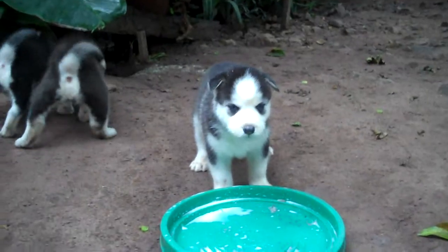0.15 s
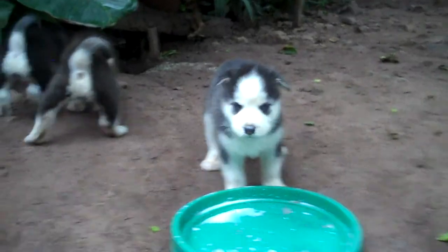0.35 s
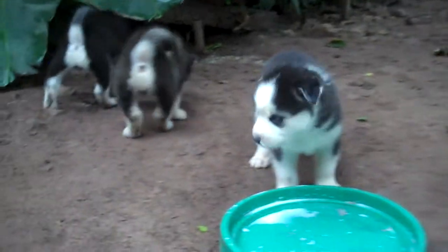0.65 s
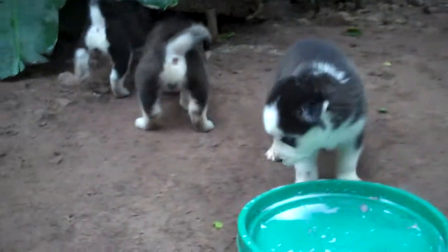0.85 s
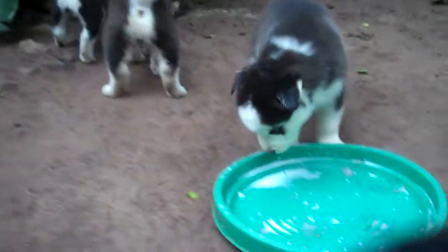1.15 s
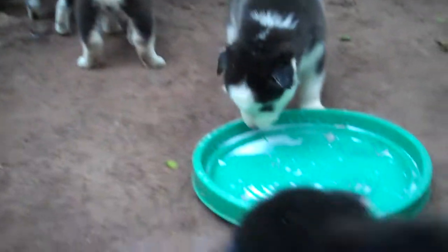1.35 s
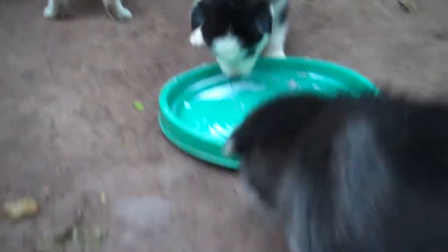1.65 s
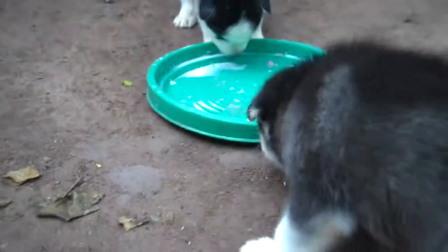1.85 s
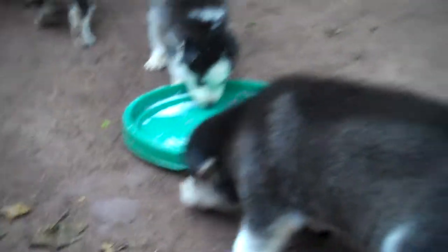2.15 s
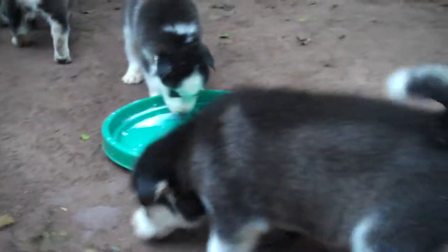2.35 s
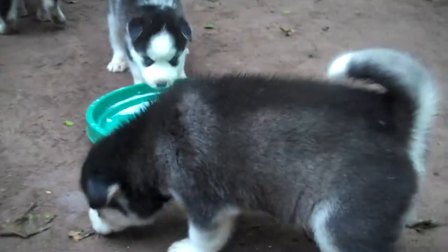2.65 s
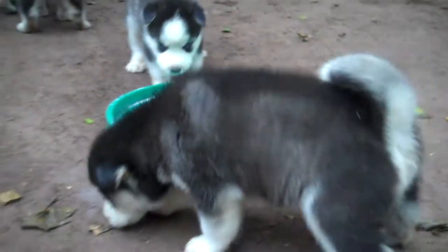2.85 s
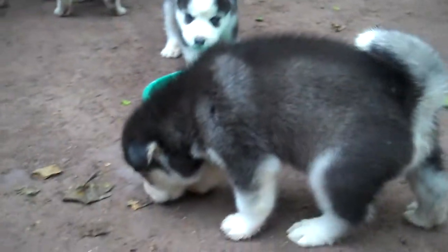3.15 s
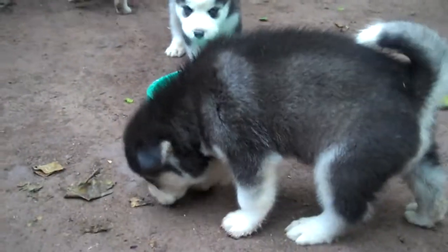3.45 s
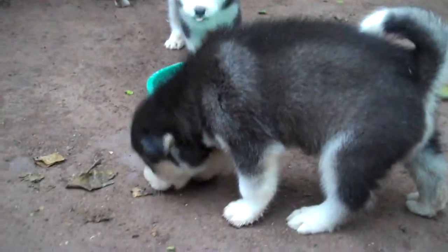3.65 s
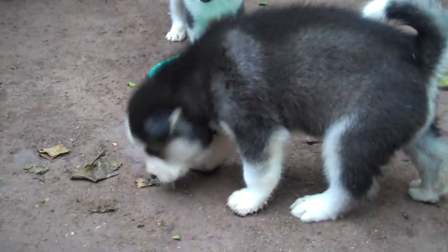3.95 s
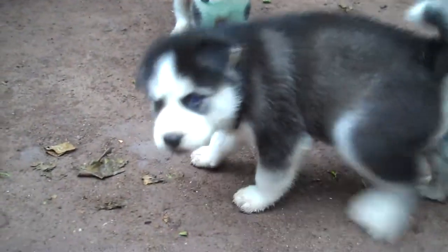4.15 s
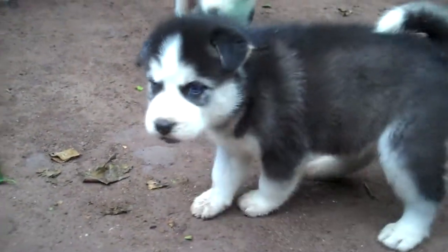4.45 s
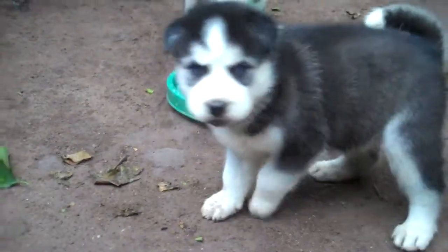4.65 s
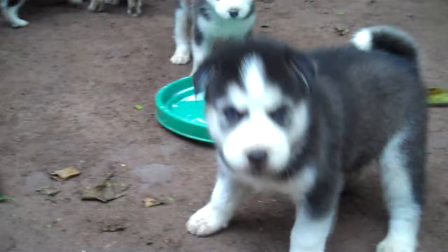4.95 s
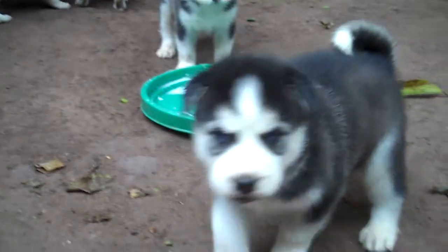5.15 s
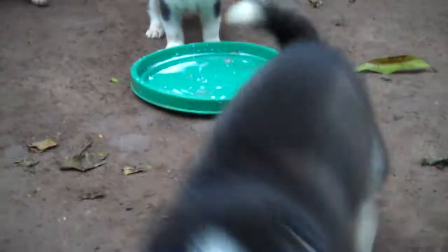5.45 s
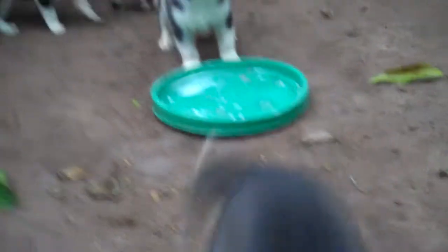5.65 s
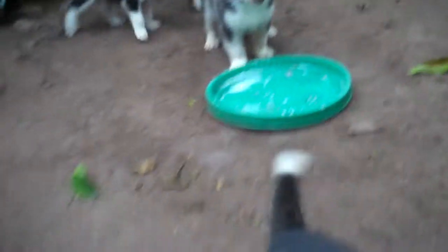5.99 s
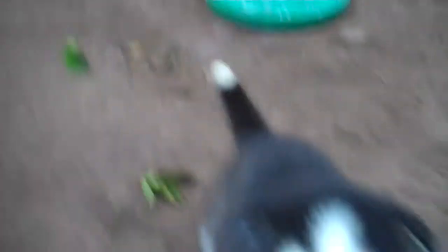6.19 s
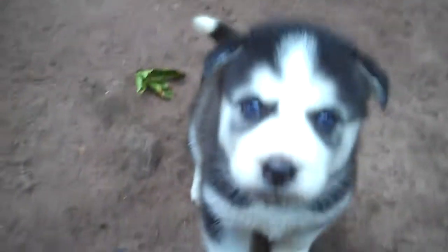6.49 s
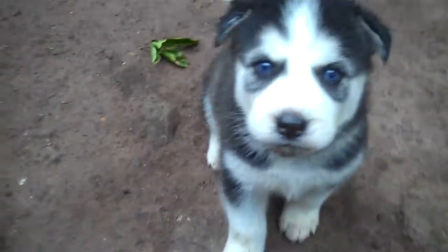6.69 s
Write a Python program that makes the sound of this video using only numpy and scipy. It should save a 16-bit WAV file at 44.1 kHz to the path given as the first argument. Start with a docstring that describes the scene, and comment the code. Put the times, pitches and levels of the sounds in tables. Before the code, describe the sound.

Outdoors on bare earth, puppies move close to the microphone: soft gritty scuffs, small dry ticks and a couple of hollow knocks. Early on a hoarse rooster crows far away over faint air murmur and hiss, with tiny bird peeps. Late, one puppy gives a single short, high, harsh yelp, very close and overloading; the background dips briefly, then light scuffs and ticks return.

```python
"""Puppies at a water dish, close to the microphone

On a yard's bare earth, paws scuff (brushing noise and grains), tongues and teeth tick and hard things knock
(damped rings), and one paw thuds (a dull noise push). One puppy yelps right at the microphone: harmonics sweep
through throat resonances, overload the recorder and turn its gain down for a moment. Far off a hoarse rooster
crows (smeared harmonics), birds peep (gliding pure notes), a motor hums (a wavering tone) and the open air
murmurs (shaped noise).
"""
import sys
import numpy as np
from scipy import signal
from scipy.fft import rfft, irfft
from scipy.io import wavfile
from scipy.ndimage import uniform_filter1d, minimum_filter1d

SR = 44100
rng = np.random.default_rng(int(sys.argv[2]) if len(sys.argv) > 2 else 0)


def generate_wav(sig):
    """Save sig (samples, or channels by samples) to the path in sys.argv[1] as 16-bit PCM at SR."""
    pcm = np.round(np.clip(np.atleast_2d(sig).T, -1, 1) * 32767).astype(np.int16)
    wavfile.write(sys.argv[1], SR, pcm)


N = 300872
T = np.arange(N) / SR
FREQS = np.fft.rfftfreq(N, 1 / SR)


def undb(db):
    """Decibels to gain."""
    return 10 ** (np.asarray(db) / 20)


def unit(x):
    """Scale to rms 1."""
    return x / np.sqrt(np.mean(x ** 2))


def shape(points, hz):
    """Gain of a (f/Hz, level/dB) spectrum at the given frequencies, joined along log frequency."""
    f, db = np.transpose(points)
    return undb(np.interp(np.log(hz + 1), np.log(f), db))


def filtered(x, gain):
    """Apply one gain for each of FREQS."""
    return irfft(rfft(x) * gain, N)


def noise(points):
    """Noise of rms 1 with the given spectrum."""
    return unit(filtered(rng.standard_normal(N), shape(points, FREQS)))


def walk(rate_hz):
    """Smooth random wander of rms 1, mostly slower than the given rate."""
    return unit(filtered(rng.standard_normal(N), np.exp(-np.minimum(FREQS / rate_hz, 10) ** 2)))


def swell(middle, length):
    """A bell-shaped rise and fall, 17 dB down at the ends of its length."""
    return np.exp(-2 * np.minimum(np.abs(2 * (T - middle) / length), 10) ** 2)


def rise(at, ramp):
    """A smooth step from 0 to 1 around the given time."""
    return .5 + .5 * np.tanh((T - at) / ramp)


def decay(age, t60):
    """Exponential die-away, 60 dB down after t60 seconds."""
    return np.exp(-np.log(1000) * np.minimum(age / t60, 10))


def yelp(rasp_jitter=0.025, air_db=-34, rasp_noise_db=-8, uneven=.6, resonance_lift=.2):
    """Vocal folds sweep an arch of pitch through the throat resonances; the forced start is harsh and uneven."""
    voice_jitter = .003  # share of the pitch
    hz, loudness, rasp, closing = yelp_controls()
    on = loudness > 1e-5
    unsteady_hz = hz * (1 + (voice_jitter + rasp_jitter * rasp) * walk(340))
    phase = 2 * np.pi * np.cumsum(unsteady_hz)[on] / SR
    k = np.arange(1, 19)[:, None]  # harmonic numbers
    partials = np.sin(k * phase + rng.uniform(0, 2 * np.pi, k.shape))
    gains = throat(k * hz[on], closing[on])
    voice, buzz = np.zeros(N), np.zeros(N)
    # the voice gains a little whenever a harmonic sits on a resonance
    power = (gains ** 2).sum(0) / 2
    lift = (power / power.max()) ** resonance_lift
    voice[on] = (gains * partials).sum(0) / np.sqrt(power) * lift
    # folds that slam shut fill the valleys between the resonances with overtones: f/Hz, level/dB
    harsh = [(25, 12), (80, -14.5), (210, 9), (330, 1.5), (480, 9), (750, -0.5), (980, 9.0),
             (1400, 2.5), (1950, 6.5), (3000, -13.0), (5500, -5.5), (7200, -6), (9000, -3.5), (14000, -9.0)]
    buzz[on] = unit((shape(harsh, k * hz[on]) * partials).sum(0))
    # the blast of air crackles differently at each microphone port
    crackle = undb(rasp_noise_db) * np.array([noise(harsh), noise(harsh)])
    air = unit(filtered(rng.standard_normal(N), throat(FREQS, 0)))
    flutter = 1 + .35 * rasp * walk(700)
    flutter[on] += uneven * rasp[on] * np.cos(phase / 2)  # strong and weak cycles alternate
    sound = voice * flutter + rasp * (buzz + crackle) + undb(air_db) * air
    return sound * loudness


def yelp_controls():
    """Pitch, loudness, rasp and mouth closing (0-1): one push that sags, then drops to a whimper."""
    start_s, attack_s, hold_s, release_s = 5.511, .0025, .124, .006
    level_db, sag_db_per_s = -.5, 26.5
    closes_after_s, closing_s, closed_db = 0.097, .007, -2.5
    whimper_db, whimper_after_s, whimper_s = -16, .018, .03
    age = np.clip(T - start_s, -hold_s, 2 * hold_s)
    spent = rise(start_s + hold_s, release_s)
    closing = rise(start_s + closes_after_s, closing_s)
    whimper = undb(whimper_db) * swell(start_s + hold_s + whimper_after_s, whimper_s)
    push = rise(start_s, attack_s) * (1 - spent + whimper)
    loudness = push * undb(level_db - sag_db_per_s * age + closed_db * closing)

    # rasp is strong in the forced start, nearly gone in the clear voice, back in the whimper
    forced_s, forced_rasp_db, clear_rasp_db, whimper_rasp_db = .033, -6, -38.5, -17.5
    forced = 1 - rise(start_s + forced_s, attack_s)
    rasp = undb(clear_rasp_db) + undb(forced_rasp_db) * forced + undb(whimper_rasp_db) * spent

    # pitch breaks from a squeak, arches over the resting pitch and collapses when the push ends
    rest_hz, top_of_arch_hz, arch_after_s, arch_width_s = 590, 908, .0595, .051
    squeak_hz, squeak_s, break_s, collapse_oct_per_s = 966, .007, .004, 15
    bell = np.exp(-((age - arch_after_s) / arch_width_s) ** 2)
    arch = rest_hz + (top_of_arch_hz - rest_hz) * bell
    hz = squeak_hz + (arch - squeak_hz) * rise(start_s + squeak_s, break_s)
    collapse = 2 ** (-collapse_oct_per_s * np.maximum(age - hold_s, 0))
    return hz * collapse, loudness, rasp, closing


def throat(hz, closing, muffle_db=17):
    """Gain of the steep throat resonances and nasal notches; the closing mouth muffles the upper ones."""
    # throat resonances: f/Hz, width/Hz, level/dB
    resonances = [(860, 1400, -37.5), (1296, 290, -1), (2630, 640, 8.5), (4044, 750, 5), (5280, 290, 1),
                  (6830, 960, -1), (8080, 400, -12), (12100, 6500, -42.5)]
    # bands the nose swallows: f/Hz, width/Hz, level/dB
    nose_notches = [(2230, 260, -22), (3540, 270, -19)]
    grid = np.linspace(0, SR / 2, 2048)
    gain = sum(undb(db) / (1 + ((grid - f) / (width / np.sqrt(2))) ** 2) ** 2 for f, width, db in resonances)
    notch_db = sum(db / (1 + (2 * (grid - f) / width) ** 2) for f, width, db in nose_notches)
    octaves_up = np.clip(np.log2((hz + 1) / 1400), 0, 1)  # full muffling from one octave above 1400 Hz
    return np.interp(hz, grid, gain * undb(notch_db)) * undb(-muffle_db * closing * octaves_up)


def scuffs(grain_spread_db=5, grains_per_s=900):
    """Each scuff is a smooth brush of earth plus grains of grit that snap under the paw."""
    # paws and fur on dry earth: middle t/s, length/s, level/dB, dull share/dB
    paw_moves = [(.049, .15, -40, -16), (.778, 0.088, -52, -4.5), (1.003, 0.088, -51.5, -9.5),
                 (1.116, .05, -43.5, -8.5), (1.193, 0.093, -46, -25), (1.37, 0.075, -58, -2.5),
                 (1.502, .05, -53, -19), (1.672, 0.054, -56.5, 1.5), (3.311, 0.05, -47.5, -27),
                 (3.659, 0.2, -51, -7), (3.856, 0.027, -41, -15), (3.887, 0.03, -44, -15),
                 (4, 0.083, -57, -5), (4.628, 0.16, -56, -4), (5.013, .33, -61, -11),
                 (5.282, .013, -49, -8), (5.306, .03, -48.5, -8.5), (5.46, 0.17, -47.5, -9),
                 (5.946, 0.36, -55, -6), (6.18, 0.18, -51.5, 1.5), (6.35, .34, -55.5, -15),
                 (6.708, 0.091, -42, -15.5)]
    # spectrum of snapping grit: f/Hz, level/dB per Hz
    grit_colour = [(300, -50), (2500, -13.5), (4500, -9), (6000, -0.5), (7700, 3.5), (9500, -11),
                   (14000, -23.5)]
    # spectrum of dull earth: f/Hz, level/dB per Hz
    earth_colour = [(100, -17.5), (500, -0.5), (1000, 4), (1900, 5), (3800, -1.5), (6000, -21.5),
                    (12000, -40.5)]
    gritty_s = 0.23  # short scuffs snap grit; longer ones mostly brush
    grains = (rng.random(N) < grains_per_s / SR) * rng.choice([-1, 1], N)
    grains = unit(grains * undb(grain_spread_db * np.minimum(rng.exponential(size=N), 3)))
    brush = rng.standard_normal(N)
    bright, dull = np.zeros(N), np.zeros(N)
    for s, length, db, dull_db in paw_moves:
        grit = np.exp(-abs(length / gritty_s))
        texture = np.sqrt(1 - grit) * brush + np.sqrt(grit) * grains
        push = undb(db) * swell(s, length) * texture
        bright += push
        dull += undb(dull_db) * push
    bright = filtered(bright, unit(shape(grit_colour, FREQS)))
    return bright + filtered(dull, unit(shape(earth_colour, FREQS)))


def thud():
    """One paw lands with a soft thud: a dull, brief push into the ground."""
    # spectrum of the struck ground: f/Hz, level/dB per Hz
    ground_colour = [(120, -28), (270, 3), (450, -5), (900, -5), (1600, -38)]
    middle_s, length_s, level_db = 1.672, 0.066, -49.5
    return undb(level_db) * swell(middle_s, length_s) * noise(ground_colour)


def ticks(ring_db=-5, crack_db=-8, crack_share=0.14, crack_octaves=0.38):
    """Each tick is a quickly damped ring of up to two modes and a crack spread around the same pitch."""
    # tongue, teeth, claws and grit: t/s, level/dB, ring f/Hz
    close_ticks = [(.843, -28, 7140), (.891, -34, 7460), (.992, -27, 3090), (1.014, -28.5, 5700),
                   (1.1145, -22, 7400), (1.675, -31, 2910), (2.410, -29, 4400), (2.589, -25, 5400),
                   (3.296, -27, 7400), (3.302, -24, 7200), (3.337, -30.5, 2750), (3.348, -21, 5170),
                   (3.360, -23, 2040), (3.661, -36, 1820), (3.683, -34.5, 2090), (3.785, -36, 6460),
                   (4.883, -40.5, 622), (5.303, -28, 5600), (5.445, -30, 7000), (5.464, -26, 7200),
                   (5.472, -28.5, 2600), (5.481, -26, 2797), (6.556, -24, 2100), (6.687, -23.5, 7200),
                   (6.714, -24, 4900)]
    ring_cycles = 27  # every tick dies away by 60 dB in as many cycles
    # the second mode of a small hard thing
    overtone_ratio, overtone_db, highest_mode_hz = 2.75, -3.5, 9000
    t = T[:4096]
    freqs = np.fft.rfftfreq(len(t), 1 / SR) + 1
    out = np.zeros(N + len(t))
    for s, db, hz in list(close_ticks) + stray_ticks():
        t60 = ring_cycles / hz
        modes = [(hz, 1), (overtone_ratio * hz, undb(overtone_db))]
        ring = sum(g * np.sin(2 * np.pi * f * t) for f, g in modes if f < highest_mode_hz)
        ring = ring * decay(t, t60)
        colour = 1 / (1 + (np.log2(freqs / hz) / crack_octaves) ** 2)
        crack = unit(irfft(rfft(rng.standard_normal(len(t))) * colour))
        crack = crack * np.exp(-t / (crack_share * t60))
        start = int(s * SR)
        out[start:start + len(t)] += undb(db) * (undb(ring_db) * ring + undb(crack_db) * crack)
    return out[:N]


def stray_ticks():
    """Fainter ticks at chance times, levels and pitches, as rows of t/s, level/dB, f/Hz."""
    per_s, mid_db, spread_db, mid_hz, spread_octaves = 4, -45.5, 3, 3500, 1.2
    when, size, pitch = rng.random((int(per_s * N / SR), 3)).T
    db = mid_db + spread_db * (2 * size - 1)
    hz = mid_hz * 2 ** (spread_octaves * (2 * pitch - 1))
    return list(zip(when * N / SR, db, hz))


def knocks():
    """Knocks on something hard and hollow ring the same modes; a softer contact favours the low ones."""
    # contacts: t/s, level/dB, tilt/dB per octave
    contacts = [(3.846, -27, 6.5), (3.888, -32.5, -2.5)]
    # modes of the hollow thing: f/Hz, level/dB, t60/s
    hollow_modes = [(1780, -10, 0.051), (2310, -12.5, 0.04), (5480, -2.5, 0.031), (8020, -4, 0.0099)]
    pivot_hz = hollow_modes[2][0]  # the tilt turns about the third mode
    out = np.zeros(N)
    for s, db, tilt_db in contacts:
        t = np.clip(T - s, 0, 1)
        for hz, mode_db, t60 in hollow_modes:
            gain = undb(db + mode_db + tilt_db * np.log2(hz / pivot_hz))
            out += gain * np.sin(2 * np.pi * hz * t) * decay(t, t60)
    return out


def echoes(x, far_db=-40, far_t60=0.6):
    """Ground and nearby walls answer at once; the wider yard adds a faint, dull tail."""
    near_db, near_t60 = -21, .24
    # f/Hz, level/dB
    far_colour = shape([(300, -11.5), (1300, -4.5), (2600, -15), (5000, -15.0), (10000, -23.0)], FREQS)
    out = []
    for near, far in rng.standard_normal((2, 2, N)):  # one pair for each port
        near = near * decay(T, near_t60) * (T > .002)
        far = filtered(far, far_colour) * decay(T, far_t60) * (T > .02)
        near = undb(near_db) * near / np.linalg.norm(near)
        far = undb(far_db) * far / np.linalg.norm(far)
        out.append(signal.fftconvolve(x, (near + far)[:SR])[:N])
    return np.array(out)


def rooster(waver=0.012, hoarse_waver=0.08, smear_t60=0.45):
    """Hoarse opening syllables and one held note, smeared by reflections on the long way here."""
    # spectrum of the far crow: f/Hz, level/dB
    crow_colour = [(600, 7), (750, 10), (1500, 12), (1950, 14), (2200, 2.5), (3000, 2), (4500, -15)]
    hz, loudness, hoarse = crow_controls()
    phase = 2 * np.pi * np.cumsum(hz * (1 + (waver + hoarse_waver * hoarse) * walk(288))) / SR
    harmonics = sum(shape(crow_colour, k * hz) * np.sin(k * phase) for k in range(1, 6))
    call = unit(harmonics) * loudness
    paths = rng.standard_normal((2, SR // 2)) * decay(T[:SR // 2], smear_t60)
    smeared = [call + signal.fftconvolve(call, p / np.linalg.norm(p))[:N] for p in paths]
    return np.array(smeared) / np.sqrt(2)


def crow_controls():
    """Pitch, loudness and hoarseness: each syllable swells, holds with a sagging pitch and fades."""
    # syllables: start t/s, length/s, pitch f/Hz, level/dB, hoarseness 0-1
    syllables = [(1.2, 0.17, 650, -56.5, .9), (1.54, 0.095, 790, -54.5, .6), (1.77, 0.25, 770, -55.5, 0.93),
                 (2.18, 0.41, 742, -57, .2)]
    edge_s, sag_hz_per_s = 0.028, 40
    throb_db, throb_rate_hz = 3, 16  # random throbbing of the level
    hz, loudness, hoarse = np.full(N, 1. * syllables[0][2]), np.zeros(N), np.zeros(N)
    for s, length, pitch, db, hoarseness in syllables:
        begun = T > s - 2 * edge_s
        hz[begun] = pitch - sag_hz_per_s * (T[begun] - s)
        hoarse[begun] = hoarseness
        loudness += undb(db) * rise(s, edge_s) * (1 - rise(s + length, edge_s))
    return hz, loudness * undb(throb_db * walk(throb_rate_hz)), hoarse


def far_notes(waver=0.015):
    """Short, nearly pure notes that glide with a slightly unsteady pitch."""
    # faint far peeps, coos and hums: middle t/s, length/s, f/Hz, level/dB, glide/octaves per s
    faint_notes = [(.635, .05, 1950, -57.5, 3), (.713, .15, 2830, -64.5, -0.5),
                   (2.13, 0.081, 2904, -58, .5), (2.839, .1, 3540, -64, 2), (3.05, .9, 167.6, -69, -0.5),
                   (3.102, .05, 7680, -59, 2), (3.25, 0.12, 478, -58.5, 1), (3.408, 0.055, 8150, -58.5, 6),
                   (3.441, 0.035, 7530, -55.5, -1), (3.475, 0.034, 8160, -54.5, 5),
                   (5.776, 0.028, 7450, -47, -5)]
    out, unsteady = np.zeros(N), 1 + waver * walk(140)
    for s, length, hz, db, glide in faint_notes:
        on = np.abs(T - s) < length
        gliding_hz = hz * 2 ** (glide * (T[on] - s)) * unsteady[on]
        phase = 2 * np.pi * np.cumsum(gliding_hz) / SR
        out[on] += undb(db) * swell(s, length)[on] * np.sqrt(2) * np.sin(phase)
    return out


def motor():
    """A far motor is one low tone of wavering pitch and level that once grows louder and stays so."""
    motor_hz, level_db = 73.6, -72
    louder_at_s, ramp_s, louder_db = 4.9, .2, 7.5
    motor_db = level_db + louder_db * rise(louder_at_s, ramp_s)
    phase = 2 * np.pi * np.cumsum(motor_hz * (1 + 0.041 * walk(27))) / SR
    return np.sqrt(2) * np.sin(phase) * undb(motor_db + 1 * walk(12))


def open_air(yard_db=-61.5, side_db=-7, swell_db=1.9):
    """The murmur of the open air is shaped noise of wandering level, partly alike at both ports."""
    # spectrum of the yard: f/Hz, level/dB per Hz
    yard_colour = [(20, -2), (50, -5), (80, -1.5), (160, 4.5), (240, -2.5), (450, -2.5), (700, -0.5),
                   (1200, -5), (2200, -12), (4500, -35.5), (14000, -22.5)]
    side = undb(side_db) * noise(yard_colour) * np.array([[1], [-1]])
    return undb(yard_db + swell_db * walk(7.9)) * (noise(yard_colour) + side)


def scene():
    """The puppies close by, with the yard around them."""
    puppies = yelp() + scuffs() + thud() + ticks() + knocks()
    return puppies + echoes(puppies.mean(0)) + rooster() + far_notes() + motor() + open_air()


def gain_control(x, threshold_db=-27, depth_db=7.5, attack_s=0.0098, hold_s=0.17, release_s=0.22):
    """Loud sound turns the gain down; it stays down for a while and then creeps back."""
    power = uniform_filter1d(np.mean(x ** 2, axis=0), size=256)
    cut_db = -np.clip(10 * np.log10(np.abs(power) + 1e-12) - threshold_db, 0, depth_db)
    # odd window lengths in samples; the origins make each window look back
    attack, hold, release = (int(s * SR) // 2 * 2 + 1 for s in (attack_s, hold_s, release_s))
    held = minimum_filter1d(cut_db, hold, origin=hold // 2)
    falling = uniform_filter1d(held, attack, origin=attack // 2)
    returning = uniform_filter1d(held, release, origin=release // 2)
    return x * undb(np.minimum(falling, returning))


def record(dry, hiss_db=-55.5):
    """Two unlike microphone ports with their own hiss, gain control, overload and a steep top cut."""
    # how much brighter the left port is than the right: f/Hz, level/dB
    port_tilt = [(100, 0), (1000, 1.5), (4500, 2.5), (5600, -12), (6500, 3), (7700, 25.5), (9000, 19),
                 (14000, 10.5)]
    # spectrum of the port hiss: f/Hz, level/dB per Hz
    hiss_colour = [(100, -16), (1000, -8.5), (4500, -8), (5100, -7), (5600, 4.5), (6300, -6.5),
                   (7600, -6.5), (9000, -14), (14000, -19.5)]
    top_hz = 14300
    tilt = shape(port_tilt, FREQS)
    ports = filtered(dry, 2 * np.array([tilt, np.ones_like(tilt)]) / (1 + tilt))
    hiss = undb(hiss_db) * np.array([noise(hiss_colour), noise(hiss_colour)])
    x = gain_control(ports + hiss)
    x = x / (1 + x ** 12) ** (1 / 12)  # overload: nearly linear up to a hard ceiling at 1
    return signal.sosfilt(signal.ellip(10, .2, 60, top_hz, fs=SR, output="sos"), x)


dry = scene()
out = record(dry)
generate_wav(out)
```